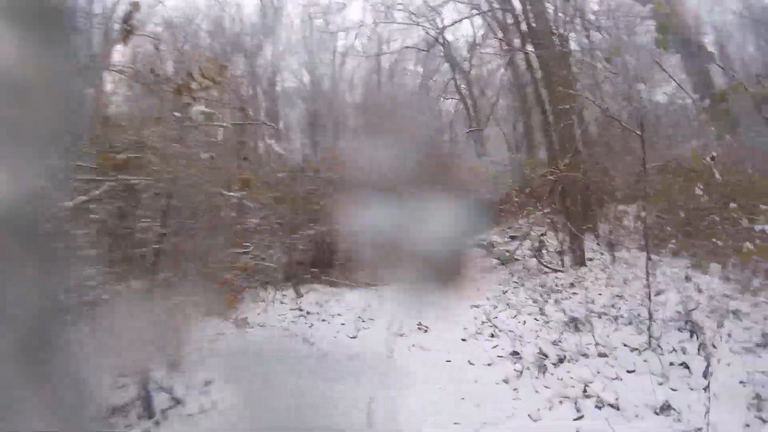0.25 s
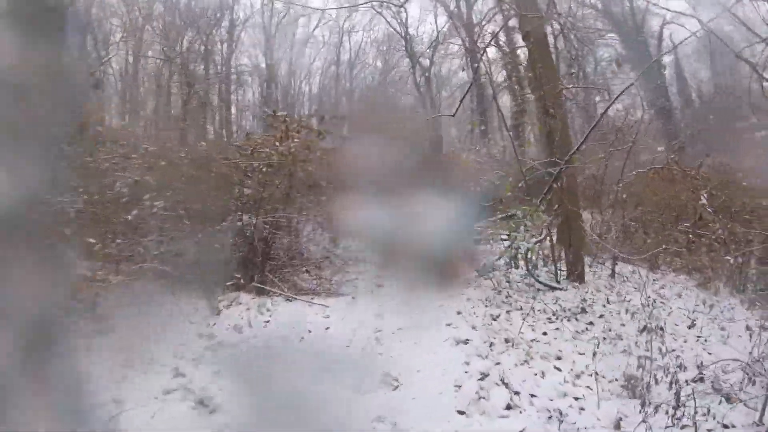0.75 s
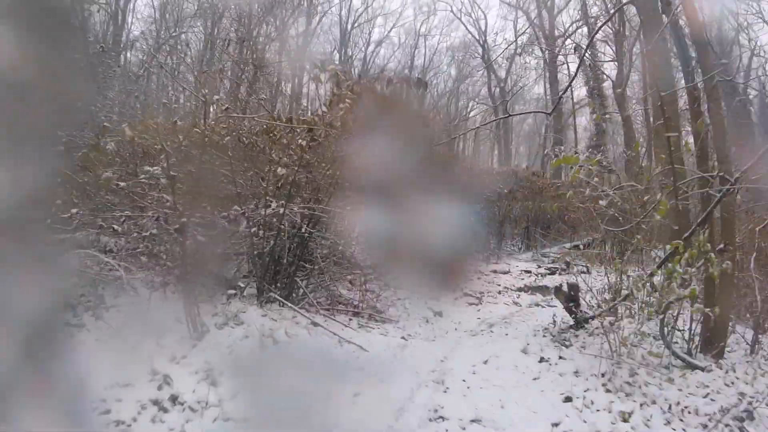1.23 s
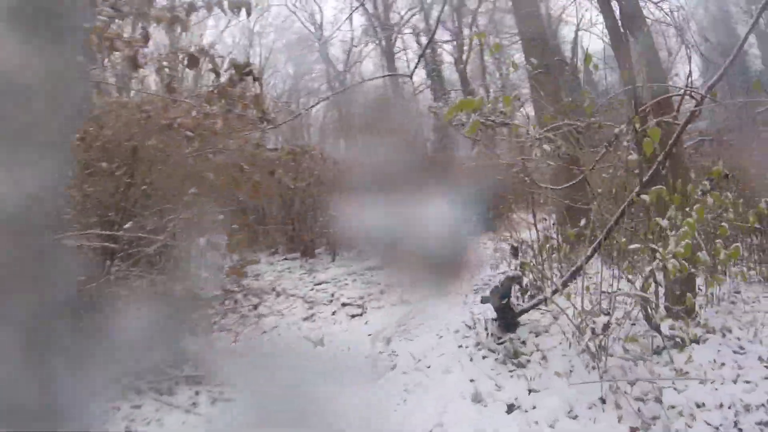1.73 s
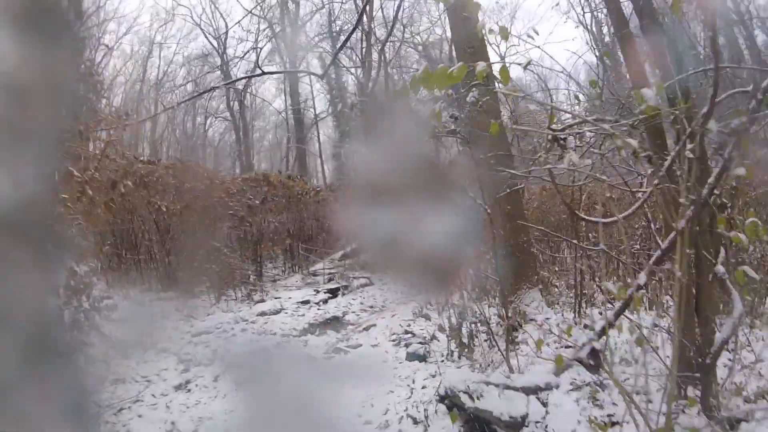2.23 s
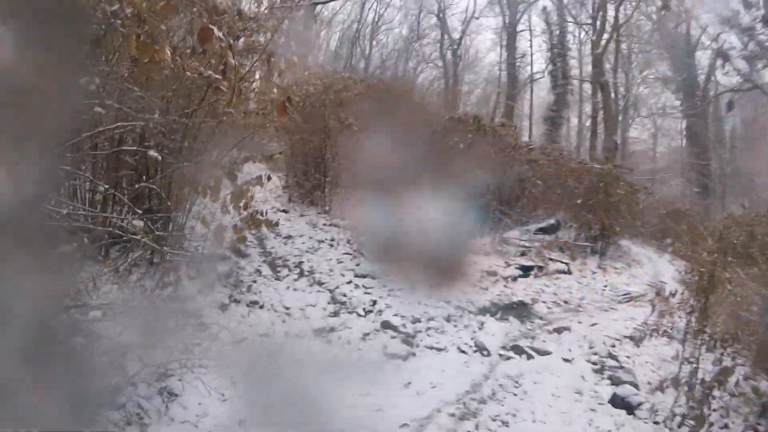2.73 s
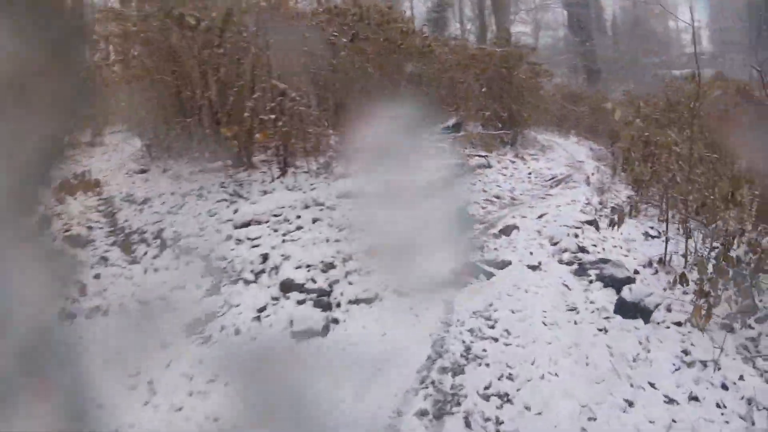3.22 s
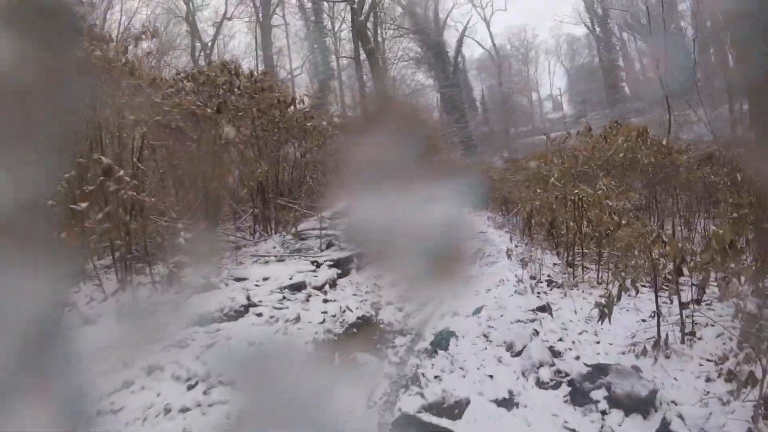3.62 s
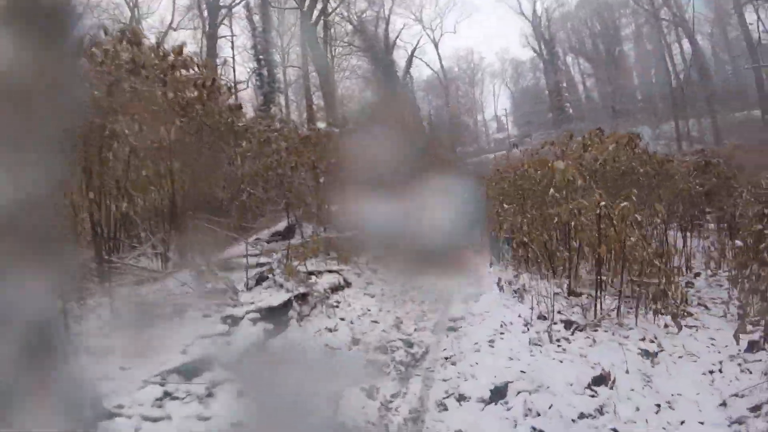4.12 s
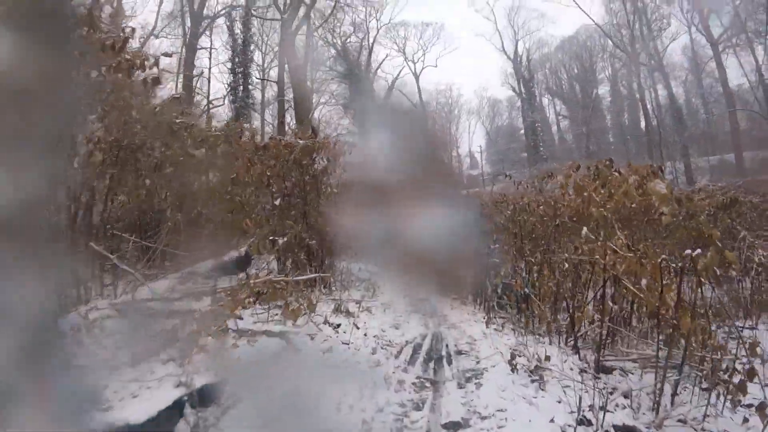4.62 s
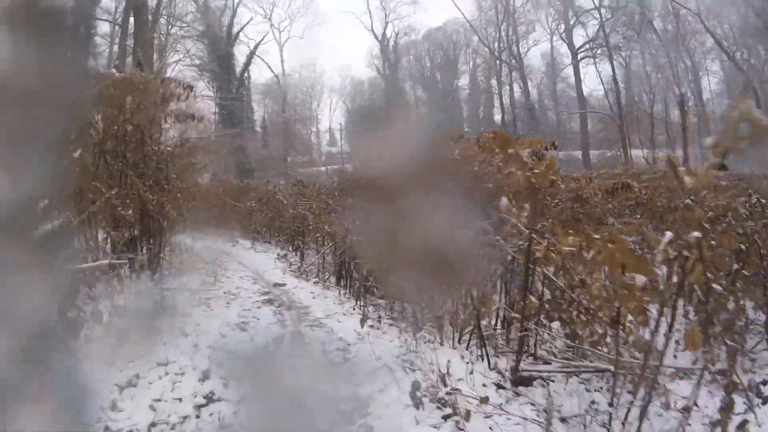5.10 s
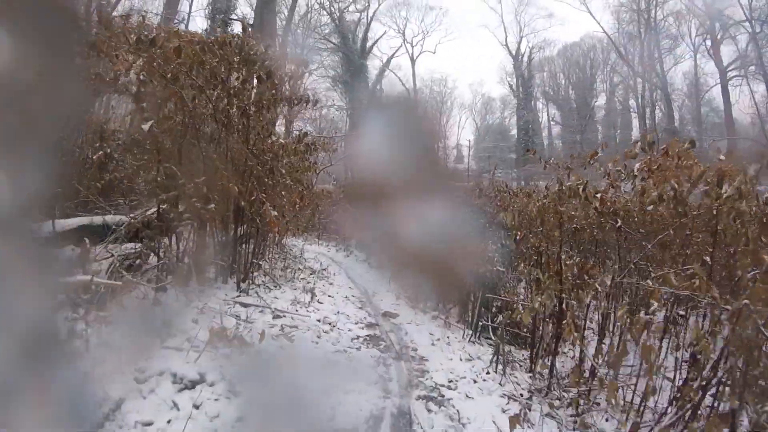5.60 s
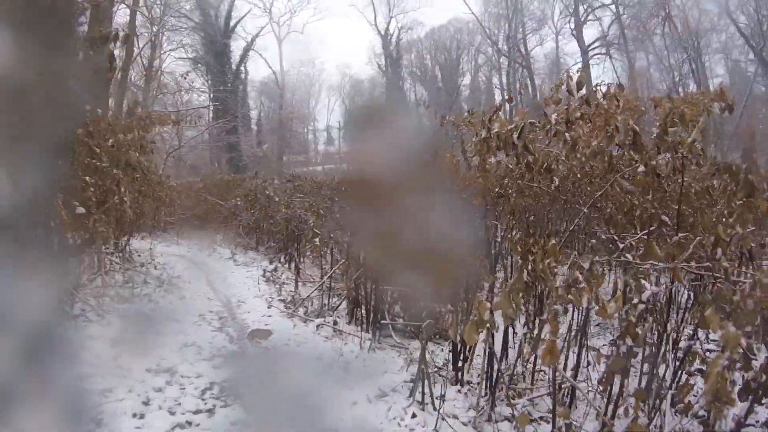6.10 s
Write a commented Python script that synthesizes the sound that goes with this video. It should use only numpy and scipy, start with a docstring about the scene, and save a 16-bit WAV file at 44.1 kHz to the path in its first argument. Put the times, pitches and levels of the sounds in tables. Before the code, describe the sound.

A bicycle rides a thinly snow-covered forest trail for about 6.3 seconds, heard close and muffled inside a camera case mounted on it. A deep, fluttering rumble and shudder continues throughout, beneath soft tyre drumming and faint granular snow hiss. Small clatter and a tick come near 0.3, then two bright, hard plastic ticks at 0.7 and 0.87. Bumps begin around 0.9; hollow frame knocks follow at 1.2 and, strongest with a crunch, at 1.44. Rolling is fuller from 1.6 to 2.3, with lesser ticks between 2.1 and 2.4 and a knock at 2.64. From 3.0 to 4.7 the stony bend gives heavy, boomy thumps, especially at 3.04, 3.5 and 4.2, with grit, little crunches and a tiny metallic ting at 3.83. After 4.8 it eases; dry weeds scrape faintly from 5.1, and rumble swells around 6.0 before final bumps.

```python
"""Bicycle on a snowy trail

A bicycle rolls along a woodland trail, heard inside the case of a camera that rides with it; dry weeds brush past.
Filtered noise shakes the springy mount, and each stone adds a push, a rebound and a damped mount ring.
Random grains, coloured by spectra, make tyre rumble, snow hiss, crackle, grit and buzz; noise bursts make crunches.
Decaying sine modes ring the bike when it clatters, and the case when something small and hard ticks on it."""
import sys
import numpy as np
from scipy import signal
from scipy.fft import rfft, irfft
from scipy.io import wavfile
from scipy.ndimage import uniform_filter1d

SR = 44100
rng = np.random.default_rng(int(sys.argv[2]) if len(sys.argv) > 2 else 0)


def wav_out(sig):
    """Save sig, one row per channel (or a flat mono array), as 16-bit PCM at SR to the path in sys.argv[1]."""
    wavfile.write(sys.argv[1], SR, np.round(np.clip(np.atleast_2d(sig).T, -1, 1) * 32767).astype(np.int16))


N = 280035
T = np.arange(N) / SR
HIT_T = T[:SR // 2]  # half a second for each blow

# thumps from the ground, levels ahead of the softening:
# (time [s], thud level [dB], length of push and rebound [ms], mount ring level [dB])
STONE_THUMPS = [(0.905, -19, 13, -17), (1.017, -55, 16, -23), (1.26, -23, 16, -23.5),
                (1.384, -18.5, 17, -21.5), (1.451, -38, 37, -14.5), (1.498, -43, 12, -23.5),
                (1.872, -20, 18, -25), (2.01, -21.5, 27, -16), (2.238, -20.5, 27.5, -28),
                (2.682, -19, 47, -14.5), (2.87, -17.5, 22.3, -49), (3.041, -9, 14.5, -18.5),
                (3.065, -17.5, 16.4, -30), (3.152, -51, 9.1, -22), (3.401, -17.5, 13.7, -18),
                (3.485, -9, 19.5, -16), (3.518, -11, 17.3, -13.5), (3.825, -22.5, 33, -23.5),
                (3.978, -24, 19.4, -23), (4.027, -26, 10, -15), (4.056, -16.5, 17.7, -17.5),
                (4.214, -10, 15.5, -33.5), (4.232, -13, 31, -19.5), (4.471, -45, 32, -16),
                (4.628, -12, 19.4, -21.5), (4.657, -18, 12.5, -21), (4.688, -23.5, 36, -30),
                (5.137, -24.5, 19, -25.5), (5.954, -20, 30, -55), (6.172, -26, 17, -13.5),
                (6.234, -12, 17.4, -45), (6.316, -17.5, 36, -40)]
# jolts that make the bike clatter: (time [s], level [dB], treble corner [Hz], time to rebound [ms],
# rebound relative to the blow [dB], favoured pitch [Hz], weight of the lowest mode [dB])
BIKE_KNOCKS = [(0.254, -38, 1300, 1.53, -2, 560, -5), (0.413, -37.5, 2000, 4.7, -9, 496, -1),
               (1.2178, -24, 560, 5.7, -8, 400, 9.5), (1.3027, -37.5, 1300, 5.2, -10, 475, -6),
               (1.442, -16, 750, 6.9, -4.5, 440, 9), (1.458, -30, 400, 12, -1, 300, 7),
               (1.900, -37, 1300, 2.1, -12, 350, 5), (1.950, -38, 900, 3.7, 0, 450, -3),
               (2.004, -40.5, 1800, 8.9, -16, 350, -2), (2.16, -35.5, 900, 4.2, -14, 696, 0),
               (2.4131, -33.5, 250, 4.7, -14, 480, 8), (2.622, -42.5, 900, 4, -1, 600, -7),
               (2.6435, -23.5, 650, 6.2, -5.5, 510, -4.5), (2.771, -35.5, 350, 17.3, 4, 480, 2),
               (2.803, -36.5, 300, 18, 0, 420, 3), (3.035, -39, 400, 5, -17, 301, 13),
               (3.483, -37.5, 400, 3.4, -8, 257, -1), (3.509, -33.5, 400, 8.8, -8, 298, -3),
               (3.525, -37.5, 300, 11.4, 0, 300, 1), (3.831, -35.5, 900, 6.6, 0, 440, 8),
               (4.213, -41.5, 905, 20, 9, 283, 4), (4.628, -41.5, 900, 3.7, -16, 900, 1),
               (4.645, -37, 600, 12, -16, 520, 3), (4.703, -40.5, 500, 4.2, 1, 560, 0),
               (4.7873, -32.5, 520, 9.5, -8, 470, -1.5)]


def undb(db):
    """Level is logarithmic: decibels to amplitude gain."""
    return 10 ** (np.asarray(db) / 20)


def unit(x):
    """Power normalisation: scale to rms 1."""
    return x / np.sqrt(np.mean(x ** 2))


def add(out, s, x):
    """Superposition: mix x into out from time s on."""
    i = max(int(s * SR), 0)
    out[i:i + len(x)] += x[:max(N - i, 0)]


def colour(x, points):
    """Spectral shaping: weight x by (frequency [Hz], relative density [dB]) points, with skirts outside."""
    hz, db = np.transpose(points)
    f = np.maximum(np.fft.rfftfreq(N, 1 / SR), 1)
    skirts = np.minimum(f / hz[0], 1) ** 2 * np.minimum(hz[-1] / f, 1) ** 2
    gain = undb(np.interp(np.log(f), np.log(hz), db)) * skirts
    return irfft(rfft(x) * gain, N)


def resonate(x, hz, width_hz):
    """Resonance: one second-order peak with gain 1 at its centre."""
    return signal.lfilter(*signal.iirpeak(hz, hz / width_hz, fs=SR), x)


def soften(x, corner_hz):
    """Contact stiffness: a softer contact loses treble above its corner."""
    return signal.lfilter(*signal.butter(1, min(corner_hz, SR / 2 - 1), fs=SR), x)


def ring(hz, t60_ms, lag_ms=0, rise_cycles=0.0075):
    """Free vibration: a struck mode starts after a lag, builds up over some cycles and decays."""
    t = np.maximum(HIT_T - lag_ms / 1000, 0)
    fade = np.exp(-np.log(1000) * t * 1000 / t60_ms)
    rise = 1 - np.exp(-hz * t / rise_cycles)
    return np.sin(2 * np.pi * hz * t) * fade * rise


def walk(rate):
    """Random modulation: smoothed random steps, rate per second, with rms near 1."""
    k = int(SR / rate)
    steps = np.repeat(rng.standard_normal(N // k + 1), k)
    return unit(uniform_filter1d(steps, k)[:N])


def grains(rate, spread_db):
    """Shot noise: random impulses, rate per second, many small and a few large, at rms 1."""
    size = undb(spread_db * np.minimum(rng.exponential(size=N), 5))
    return unit((rng.random(N) < rate / SR) * size * rng.choice([-1, 1], N))


def mount(trail_db):
    """Forced vibration: rough ground shakes the springy mount while the whole camera sways more slowly."""
    shake = resonate(resonate(resonate(rng.standard_normal(N), 89.5, 26), 85.4, 40), 86.6, 69)
    sway = resonate(resonate(rng.standard_normal(N), 29.0, 35), 36.0, 49)
    # levels relative to the trail's roughness; uneven ground makes the shake come and go
    shake_db, sway_db = 2.5, 3
    jostle_db, jostle_per_s = 2.5, 10
    shake = unit(shake) * undb(shake_db + jostle_db * walk(jostle_per_s))
    sway = unit(sway) * undb(sway_db)
    return (shake + sway) * undb(trail_db)


def weeds(attack_s=0.036, release_s=0.061):
    """Friction noise: stalks scrape past in a fine crackle that swells and fades."""
    # dry weeds along the bike: (time [s], length [s], level [dB])
    passes = [(5.107, 0.094, -60), (5.625, 0.2, -59.5), (5.982, 0.18, -56), (6.19, 0.22, -57)]
    # colour of the scraping: (frequency [Hz], relative density [dB per Hz])
    scrape_spectrum = [(1500, 4), (3300, 2), (5000, 5), (5900, 1), (6600, 11.5), (7500, -2), (9800, -4),
                       (10700, -25), (13000, -34)]
    swell = np.zeros(N)
    for s, length_s, db in passes:
        rise = (T - s) / attack_s
        fall = (s + length_s - T) / release_s
        swell += undb(db) * np.clip(np.minimum(rise, fall), 0, 1)
    return swell * unit(colour(grains(900, 1.4), scrape_spectrum))


def contact(skip_db=-5.5, skip_ms=27, hardest_count=3):
    """Loss of contact: the wheel skips just before the landings with the strongest thuds and tyre noise drops."""
    gain = np.ones(N)
    hardest = sorted(STONE_THUMPS, key=lambda thump: -thump[1])[:hardest_count]
    for s, *_ in hardest:
        gain[(T < s) & (T > s - skip_ms / 1000)] = undb(skip_db)
    return uniform_filter1d(gain, size=200)


def tyres(rumble_db, hiss_db):
    """Granular excitation: knobs drum the frame and snow packs in fine grains, crackling crust and coarse crumbs."""
    # tyre rumble through the frame: (frequency [Hz], relative density [dB per Hz])
    rumble_spectrum = [(110, -29), (170, -12), (235, -17), (330, 4.5), (400, 1), (455, 6), (570, 2),
                       (700, -12.5), (1000, -18.5), (1500, -39.5), (3000, -42)]
    # snow hiss through the case: (frequency [Hz], relative density [dB per Hz])
    hiss_spectrum = [(500, 1.5), (1000, 4), (1900, 1.5), (2500, -2.5), (3400, -2), (4100, -6.5), (5000, -2),
                     (5600, -5), (5950, -11.5), (6800, -7), (7400, -7.5), (9000, -10.5), (10000, -16),
                     (10600, -22), (12500, -20), (15000, -38)]
    # breaking snow crust: (frequency [Hz], relative density [dB per Hz])
    crust_spectrum = [(600, -4), (1000, 4), (1900, -2.5), (3300, -7), (6000, -21.5)]

    knobs = grains(2500, 2.2)
    rumble = unit(colour(knobs, rumble_spectrum)) * undb(rumble_db - 0.64 + 1.37 * walk(25))

    packing = unit(colour(grains(9000, 1.0), hiss_spectrum))
    # the case lets one narrow treble band through best
    case_hz, case_width_hz = 6500, 180
    case_band = resonate(rng.standard_normal(N), case_hz, case_width_hz)
    case_band = unit(resonate(case_band, case_hz, 2300))
    hiss = (packing + undb(-9.0) * case_band) * undb(hiss_db + 1.0 * walk(24))

    # level relative to the packing snow, fractures per second
    crackle_db, crackle_per_s = -6, 150
    crust = unit(colour(grains(crackle_per_s, 1.9), crust_spectrum)) * undb(hiss_db + crackle_db)

    # mean level in dB, and dB gained per dB of hiss
    crumbs_db, crumbs_growth = -68, 0.84
    crumbs = unit(resonate(resonate(grains(70, 3.4), 940, 410), 670, 1400))
    crumbs = crumbs * undb(crumbs_db + crumbs_growth * (hiss_db - np.mean(hiss_db)))
    return contact() * (rumble + hiss + crust + crumbs)


def grit():
    """Abrasion noise: each landing grinds frozen grit under the tyre, in proportion to its thud."""
    # colour of the grinding: (frequency [Hz], relative density [dB per Hz])
    grit_spectrum = [(500, -12), (760, -8), (980, 8.5), (1250, -8.5), (2000, -11), (3500, -15.5),
                     (7000, -23)]
    grit_db, grit_t60_s = -42.5, 0.2  # level relative to the thud, decay
    load = np.zeros(N)
    for s, thud_db, *_ in STONE_THUMPS:
        add(load, s, undb(thud_db + grit_db) * np.exp(-np.log(1000) * HIT_T / grit_t60_s))
    return load * unit(colour(grains(700, 2.8), grit_spectrum))


def crunches():
    """Brittle fracture: each crunch is a short, fading burst of tiny fractures, broad in pitch."""
    # snow and twigs crushed by the tyres:
    # (time [s], level [dB], nominal pitch of the band [Hz], time to fall to 1/e [ms])
    crushings = [(0.256, -43, 850, 3.2), (0.742, -49, 1410, 6.2), (1.221, -44, 844, 19),
                 (1.338, -51, 1050, 4.4), (1.443, -32, 716, 13), (1.445, -47.5, 3100, 7.5),
                 (1.594, -51, 1000, 3.5), (1.900, -43.5, 940, 2.3), (1.961, -52, 1290, 3.2),
                 (1.984, -53, 2000, 3), (2.005, -41, 980, 3.8), (2.018, -48, 2620, 1.6),
                 (2.161, -52, 1000, 4), (2.645, -41, 950, 10.5), (2.775, -52.5, 740, 30),
                 (3.037, -47.5, 850, 3), (3.113, -60, 1700, 2.4), (3.144, -54.5, 1500, 3.1),
                 (3.193, -53, 1190, 4.6), (3.258, -48.5, 1090, 2.1), (3.317, -47, 940, 2.3),
                 (3.348, -52, 2080, 2.3), (3.482, -52.5, 1000, 15), (3.509, -41, 1320, 3.6),
                 (3.5185, -45, 1000, 2.5), (3.533, -60, 1900, 8.3), (3.565, -62, 2400, 4.3),
                 (3.587, -51, 1500, 2), (3.599, -58, 2430, 1.4), (3.649, -56.5, 1380, 6),
                 (3.692, -54, 1500, 2.5), (3.830, -51, 2160, 16), (3.84, -47, 920, 9.4),
                 (3.98, -51, 1100, 3.6), (4.216, -63, 940, 35), (4.32, -46.5, 1020, 2.9),
                 (4.627, -52, 940, 6.3), (4.645, -61, 1300, 4), (4.656, -50, 1050, 4.1),
                 (4.676, -48, 1300, 1.9), (4.686, -56, 1500, 2.7), (4.786, -50, 880, 4.2),
                 (4.893, -56, 890, 4), (4.968, -54, 1400, 1.6), (5.935, -54, 1200, 12),
                 (6.047, -47.5, 4500, 4.4), (6.296, -47.5, 3880, 5.6)]
    out = np.zeros(N)
    for s, db, hz, length_ms in crushings:
        fade = np.exp(-HIT_T * 1000 / length_ms)
        fractures = rng.standard_normal(len(HIT_T)) * (rng.random(len(HIT_T)) < .15) * fade
        band = signal.butter(3, [hz / 1.7, hz * 1.5], "bandpass", fs=SR, output="sos")
        burst = signal.sosfilt(band, fractures)
        # the level is that of the burst's energy spread over the fade
        add(out, s, undb(db) * burst * np.sqrt(np.sum(fade) / np.sum(burst ** 2)))
    return out


def ticks(lag_ms=2.23, node_db=10, antinode_db=6, patch_octaves=0.23, low_hz=700, rasp_db=-12, rasp_t60_ms=22):
    """Dispersion: bending waves cross the case wall, the high ones first, so each tick chirps downwards."""
    # hard ticks on the case, as of icy crumbs: (time [s], peak level [dB], treble corner [Hz],
    # pitch left weak [Hz], pitch favoured [Hz], weight of the low modes [dB])
    case_blows = [(0.2716, -17.5, 13900, 4200, 1560, -6.5), (0.708, -11.5, 10500, 5350, 2840, -1.5),
                  (0.8690, -11.5, 12100, 2380, 3500, -1.5), (2.0748, -26, 2400, 950, 1770, -3),
                  (2.228, -29, 4960, 2580, 1720, -7), (2.2306, -23, 3500, 7160, 1650, -4),
                  (2.277, -31, 1800, 550, 1020, -2), (2.4136, -20, 480, 6700, 710, 1),
                  (3.4825, -36.5, 5000, 550, 5200, -12), (3.4856, -38, 2500, 550, 2400, -13),
                  (4.627, -37.5, 3000, 6860, 3300, -16)]
    # modes of the case: (frequency [Hz], t60 [ms], relative level [dB])
    case_modes = [(182, 71, -21), (295, 63, -10), (449, 78, -14), (506, 23.6, 7.5), (619, 38.4, -0.5),
                  (970, 19, 2), (1388, 23, -7.5), (1620, 25, -19), (1917, 11, 0), (2770, 9.6, -9),
                  (3304, 10.5, -10), (3730, 7.2, -7), (4420, 10.3, -12.5), (4820, 20, -14),
                  (5560, 9.6, -11.5), (6824, 4.7, 6), (8790, 4.4, -2.5), (12730, 5.5, -28)]
    out = np.zeros(N)
    hz = np.array(case_modes)[:, 0]
    lags = lag_ms * (np.sqrt(hz[0] / hz) - np.sqrt(hz[0] / hz[-1]))
    modes = np.array([(-1) ** k * undb(db) * ring(f, t60, lags[k], rise_cycles=1.0)
                      for k, (f, t60, db) in enumerate(case_modes)])
    for s, db, corner_hz, node_hz, antinode_hz, low_db in case_blows:
        # the place of the blow leaves some modes weak and drives others hard
        node, antinode = (np.exp(-(np.log2(hz / f) / patch_octaves) ** 2) for f in (node_hz, antinode_hz))
        # light crumbs barely move the low modes
        weights = undb(antinode_db * antinode - node_db * node + low_db * (hz < low_hz))
        # a crowd of weak overtones roughens the ring
        fade = np.exp(-np.log(1000) * HIT_T * 1000 / rasp_t60_ms)
        rasp = resonate(rng.standard_normal(len(HIT_T)), 2800, 5900) * fade
        tick = soften(weights @ modes + undb(rasp_db) * rasp, corner_hz)
        add(out, s, undb(db) * tick / np.abs(tick).max())
    return out


def buzz():
    """Loose contacts: each knock leaves parts buzzing on the frame, in proportion to its strength."""
    # colour of the buzz: (frequency [Hz], relative density [dB per Hz])
    buzz_spectrum = [(110, -23), (170, -1), (235, 8.5), (340, 10.5), (450, 8), (570, 3), (720, 1.5),
                     (1000, -20), (2000, -25), (6000, -41.5)]
    buzz_db, buzz_t60_s = -13.5, 0.45  # level relative to the knock, decay
    swell = np.zeros(N)
    for s, db, *_ in BIKE_KNOCKS:
        add(swell, s, undb(db + buzz_db) * np.exp(-np.log(1000) * HIT_T / buzz_t60_s))
    return swell * unit(colour(grains(1500, 2.1), buzz_spectrum))


def clatter(rattle_db=-28, rattle_hz=900, rattle_ms=9, favour_db=4, patch_octaves=0.51):
    """Modal excitation: a jolt rings the frame, a loose part rebounds and a fine, high rattle dies away."""
    # modes of the bike: (frequency [Hz], t60 [ms], relative level [dB])
    frame_modes = [(175, 89, -11), (271, 153, -14), (319, 21.8, -0.5), (451, 64, -4.5), (560, 19.7, 1.5),
                   (650, 10.7, 0.5), (787, 15, -3), (1010, 9.5, -7.5), (1840, 6, -16), (1820, 7.2, -11),
                   (2500, 14, -15.5), (3400, 7.3, -29), (5230, 16, -19), (6300, 13, -19), (8800, 2.3, -15)]
    # short metallic rings, as of a brake disc: (time [s], frequency [Hz], t60 [ms], level [dB])
    metal_rings = [(3.831, 2600, 14, -35), (3.833, 2800, 100, -51)]
    out = np.zeros(N)
    hz = np.array(frame_modes)[:, 0]
    modes = np.array([(-1) ** k * undb(db) * ring(f, t60, rise_cycles=0.12)
                      for k, (f, t60, db) in enumerate(frame_modes)])
    highpass = signal.butter(2, rattle_hz, "highpass", fs=SR)
    for s, db, corner_hz, rebound_ms, rebound_db, favoured_hz, boom_db in BIKE_KNOCKS:
        # the place of the blow favours some modes; the lowest has a weight of its own
        favoured = np.exp(-(np.log2(hz / favoured_hz) / patch_octaves) ** 2)
        frame = undb(favour_db * favoured + boom_db * (hz == hz[0])) @ modes
        rattle = undb(rattle_db) * rng.standard_normal(len(HIT_T)) * np.exp(-HIT_T * 1000 / rattle_ms)
        blow = signal.lfilter(*highpass, rattle)
        blow[0] += 1
        blow[int(rebound_ms * SR / 1000)] += undb(rebound_db)
        knock = soften(signal.fftconvolve(blow, frame), corner_hz)
        # the level is that of its energy spread over a fiftieth of a second
        add(out, s, undb(db) * knock / np.sqrt(np.sum(knock ** 2) / (SR / 50)))
    for s, ting_hz, t60, db in metal_rings:
        add(out, s, undb(db) * ring(ting_hz, t60))
    return out


def bumps():
    """Impulse response: each stone pushes the camera up and lets it drop; the mount rings on."""
    out = np.zeros(N)
    spring = soften(soften(ring(90.3, 310), 310), 310)
    for s, thud_db, push_ms, ring_db in STONE_THUMPS:
        turn = np.minimum(HIT_T * 1000 / push_ms, 1)
        push = soften(np.sin(2 * np.pi * turn), 250)
        add(out, s, undb(thud_db) * push + undb(ring_db) * spring)
    return out


def scene():
    """Superposition: everything that reaches the camera sums in one channel."""
    # roughness of the trail, as the level at which it shakes the mount: (time [s], level [dB])
    trail = [(0.0, -30.5), (0.32, -36.5), (2.03, -33), (2.46, -37.5), (3.0, -38), (4.65, -41.5),
             (4.97, -41.5), (5.5, -37), (6.07, -33), (6.35, -28.5)]
    # tyres, loud on the straights and quiet through the slow stony bend:
    # (time [s], rumble level [dB], snow hiss level [dB])
    rolling = [(0.0, -47.5, -60), (0.46, -51.5, -59.5), (0.8, -45.5, -60), (1.18, -49, -59),
               (1.59, -44, -55), (1.85, -43.5, -58), (2.09, -43, -58), (2.37, -49.5, -57.5),
               (2.99, -51.5, -59), (3.04, -54, -64), (3.94, -49.5, -63.5), (4.44, -54.5, -63.5),
               (4.74, -49, -64), (5.59, -48.5, -60.5), (5.85, -51.5, -58), (6.02, -39, -57),
               (6.17, -45.5, -58), (6.35, -44.5, -56)]
    trail_db = np.interp(T, *np.transpose(trail))
    s, *columns = np.transpose(rolling)
    rumble_db, hiss_db = (np.interp(T, s, c) for c in columns)
    surroundings = mount(trail_db) + weeds()
    ground = tyres(rumble_db, hiss_db) + grit() + crunches()
    blows = ticks() + buzz() + clatter() + bumps()
    return (surroundings + ground + blows)[None]


def record(dry):
    """Band limiting: the camera cuts the top with a steep elliptic low-pass."""
    top_hz = 14400
    return signal.sosfilt(signal.ellip(8, .2, 70, top_hz, fs=SR, output="sos"), dry)


dry = scene()
out = record(dry)
wav_out(out)
```